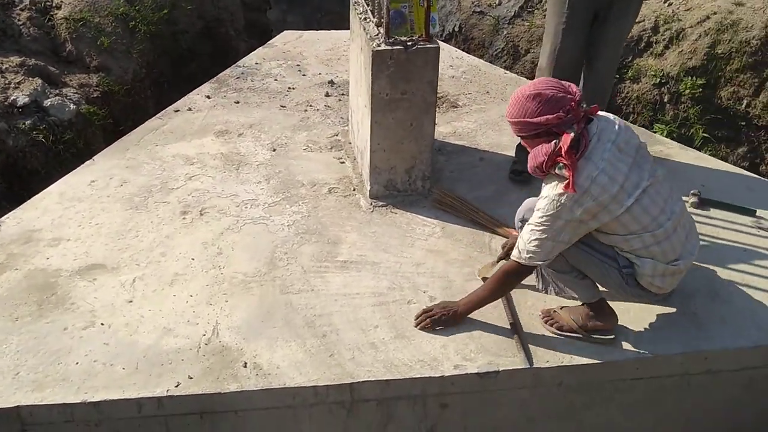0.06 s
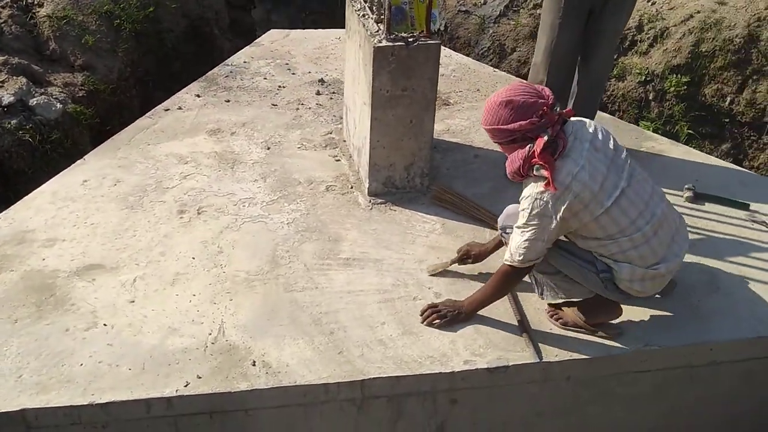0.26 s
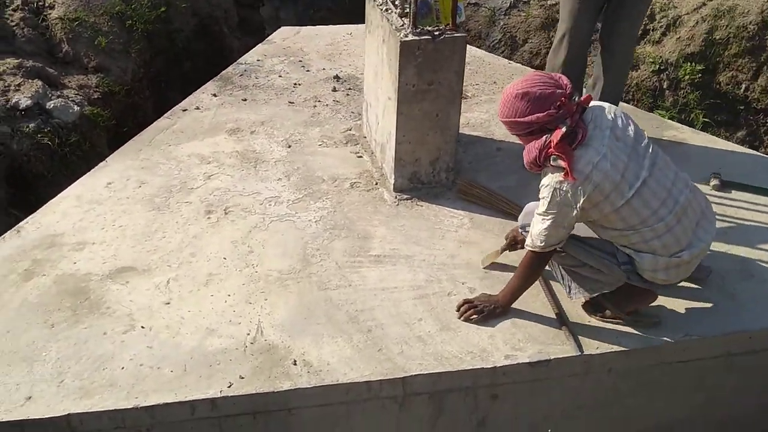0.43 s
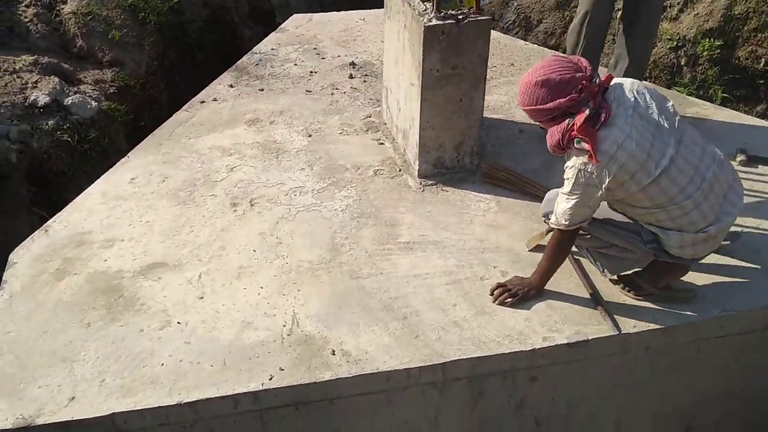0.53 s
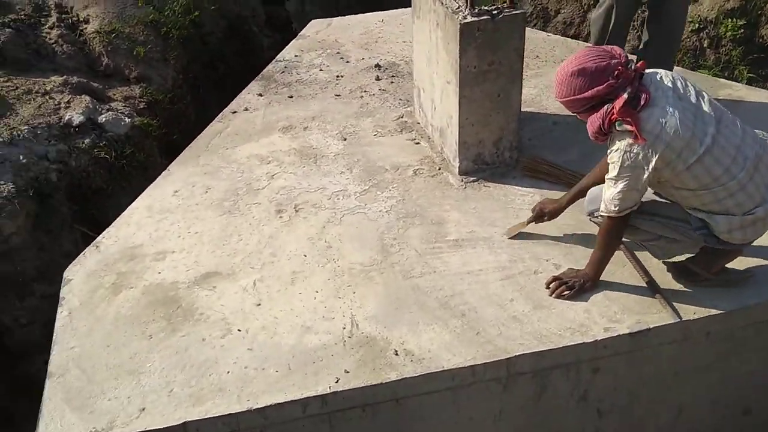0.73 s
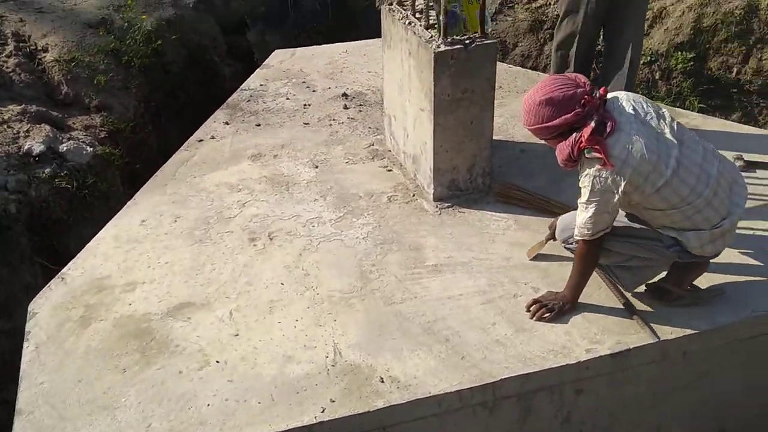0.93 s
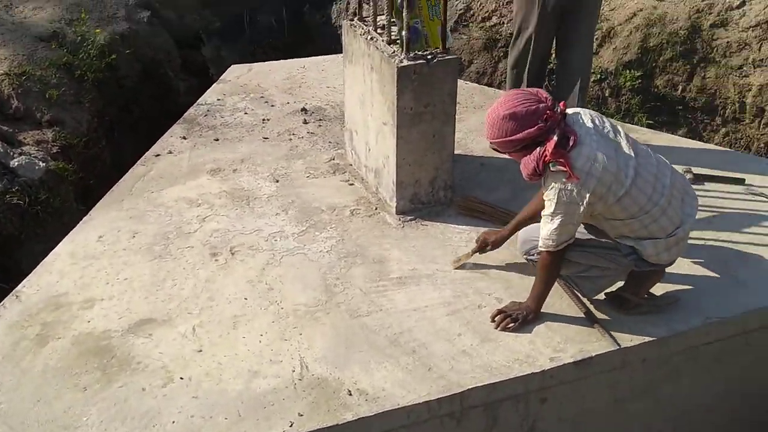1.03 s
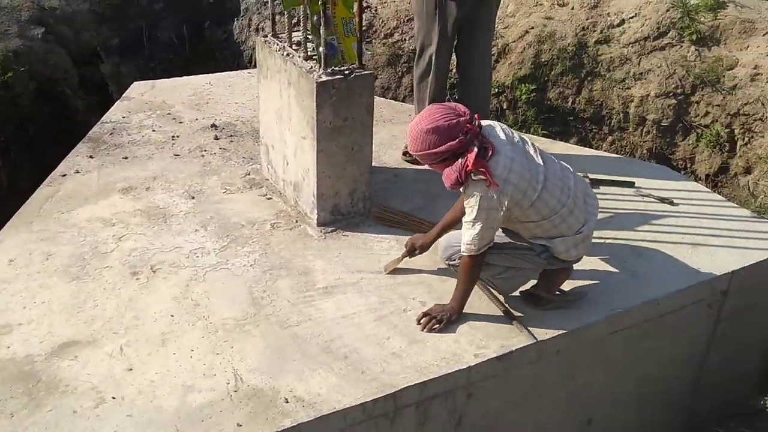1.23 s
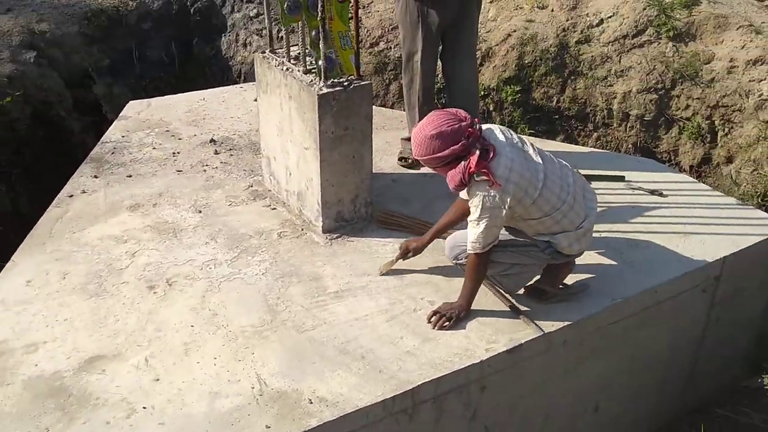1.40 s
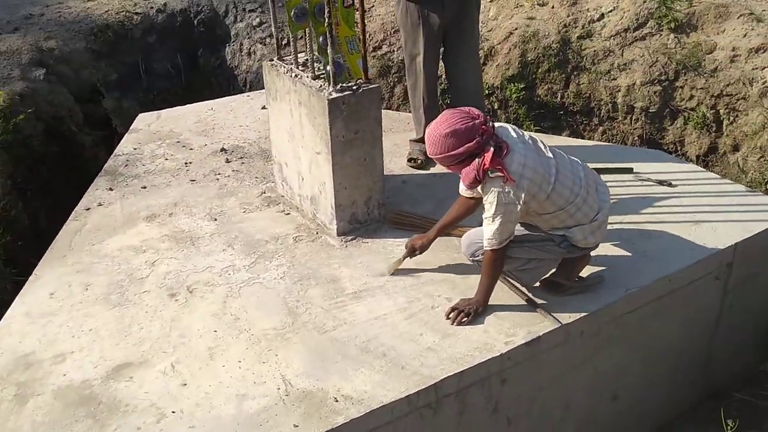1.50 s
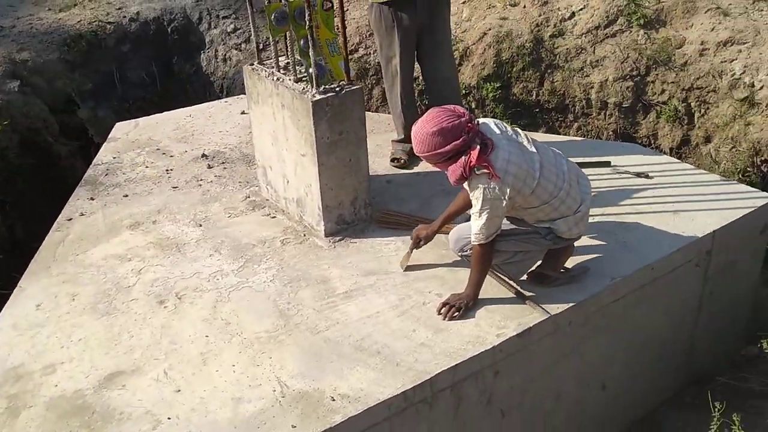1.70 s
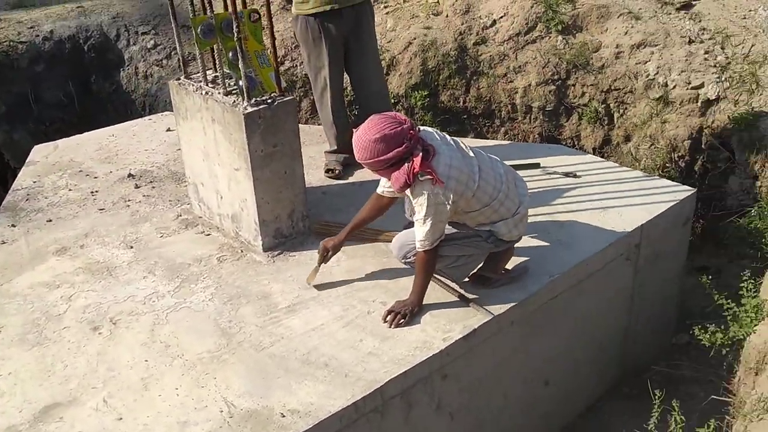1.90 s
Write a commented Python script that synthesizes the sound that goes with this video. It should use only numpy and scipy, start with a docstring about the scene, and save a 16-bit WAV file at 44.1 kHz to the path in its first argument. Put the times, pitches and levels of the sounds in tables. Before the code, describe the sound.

Gritty scraping of a hand tool on a concrete slab, about five strokes a second, with a slight ring. It catches on coarse grit and clatters near the end, while soles scuff and faint squeaks sound in the open air.

```python
"""Scraping a concrete slab

A hand tool rubs back and forth over rough concrete outdoors, five strokes a second.
Sand grains crackle under its edge and make it ring. It catches on coarse grit and
clatters at the end of the last stroke. Shifting feet scuff and knock loose stones.
A few faint squeaks and a low rumble of air lie behind."""
import sys
import numpy as np
from scipy import signal
from scipy.fft import rfft, irfft
from scipy.io import wavfile
from scipy.ndimage import map_coordinates

SR = 44100
rng = np.random.default_rng(int(sys.argv[2]) if len(sys.argv) > 2 else 0)


def transcribe(signal):
    """Save signal, clipped to [-1, 1], as a 16-bit WAV file at the path in sys.argv[1]."""
    frames = np.atleast_2d(signal).T
    limited = np.clip(frames, -1, 1)
    pcm = np.round(limited * 32767).astype(np.int16)
    wavfile.write(sys.argv[1], SR, pcm)


N = 85995
T = np.arange(N) / SR
HZ = np.maximum(np.arange(N + 1) * SR / (2 * N), 1)

# Tone colours of the sources. Each row: frequency in Hz, relative strength in dB.
AIR_COLOUR = [(150, 14), (500, -18), (1400, 4), (2300, 2.5), (3300, 3), (6000, -0.5), (15000, -16)]
RUMBLE_COLOUR = [(40, -29), (80, -8), (115, -0.5), (170, -8), (300, -16.5), (2000, -77)]
SOLE_COLOUR = [(80, -42), (180, -3.5), (340, -3.5), (800, -7), (1300, -14.5), (2000, -19), (14000, -30)]
STONE_COLOUR = [(200, -54), (600, -19.5), (820, -5), (1200, -2.5), (1620, -2), (2100, -3), (3200, -6.5),
                (6000, -15), (14000, -35)]
GRIT_COLOUR = [(300, -30), (700, -33.5), (1500, -4.5), (2300, 7), (3300, 3.5), (4300, 9), (6500, 5),
               (9000, 0), (12000, -8), (15500, -19)]
SCRAPE_COLOUR = [(600, -31), (1100, -31.5), (1650, -12), (2100, -2), (2600, -0.5), (3300, -3.5),
                 (4300, -2.5), (5500, 2), (7500, -5.5), (10500, -7.5), (12300, -14), (15500, -16.5)]
# How loud the rumble and the dragging soles are. Each row: time in seconds, level in dB.
RUMBLE_LEVEL = [(0, -45), (0.12, -87), (0.2, -57.5), (0.88, -50), (1.05, -56.5), (1.44, -48.5),
                (1.55, -58.5), (1.95, -66)]
SCUFF_LEVEL = [(0.2, -75.5), (0.55, -82), (0.66, -76), (0.77, -62), (0.81, -57), (0.875, -43), (0.98, -75),
               (1.3, -63.5), (1.425, -38.5), (1.52, -72), (1.555, -43.5), (1.62, -43.5), (1.7, -51.5),
               (1.9, -85.5)]
# Brief squeaks. Each row: start and length in seconds, pitch in Hz, level in dB.
SQUEAKS = [(-0.012, 0.041, 1505, -38.5), (0.219, 0.065, 3040, -33), (0.748, 0.026, 3380, -31.5),
           (1.776, 0.032, 893, -38), (1.832, 0.039, 2903, -42.5)]
# Soft steps. Each row: start in seconds, level in dB, fade time in seconds, pitch in Hz.
FOOTFALLS = [(0.176, -45, 0.0056, 686), (0.433, -44.5, 0.0075, 387), (0.584, -49, 0.017, 370),
             (0.728, -45, 0.011, 366), (0.7915, -23.5, 0.0024, 596), (1.091, -47, 0.019, 286),
             (1.597, -26, 0.0076, 577), (1.619, -34.5, 0.0081, 500)]
# Stones knock and grit cracks. Each row: start in seconds, level in dB, fade time in seconds.
STONE_KNOCKS = [(0.434, -37.5, 0.018), (0.475, -41.5, 0.044), (0.792, -14, 0.0032), (1.194, -23.5, 0.0021),
                (1.242, -35, 0.009), (1.281, -31, 0.0065), (1.322, -27.5, 0.017), (1.363, -25.5, 0.0068),
                (1.546, -28, 0.0087), (1.556, -20.5, 0.012), (1.585, -20.5, 0.0037), (1.5965, -19.5, 0.015),
                (1.618, -25, 0.0075), (1.643, -27, 0.019), (1.775, -41.5, 0.023), (1.829, -40.5, 0.011),
                (1.9, -42, 0.0067)]
GRIT_CATCHES = [(0.1742, -32.5, 0.011), (0.2235, -38, 0.004), (0.2552, -26, 0.0021), (0.3640, -19.5, 0.004),
                (0.461, -33, 0.0046), (0.4747, -23.5, 0.003), (0.7289, -23, 0.0063), (0.7868, -22, 0.0076),
                (0.8576, -30, 0.011), (0.9122, -25, 0.035), (1.0108, -13.5, 0.0012), (1.0901, -19, 0.012),
                (1.355, -24, 0.0045), (1.5565, -11.5, 0.0014), (1.585, -19, 0.0024), (1.5972, -15, 0.0035),
                (1.6194, -17.5, 0.0089), (1.6422, -20, 0.018), (1.6815, -34, 0.011), (1.727, -35, 0.0035),
                (1.8315, -32.5, 0.013), (1.9007, -38.5, 0.011)]
# Where the stones and the tool's edge ring. Each row: pitch in Hz, boost in dB.
STONE_RINGS = [(863, 7), (1263, 6), (1662, 6.5)]
EDGE_RINGS = [(3020, 7.4), (3270, 6.2), (3580, 3.9)]
# Steady rings of the tool. Each row: pitch in Hz, width in Hz, boost in dB.
TOOL_RINGS = [(3380, 400, 4), (5170, 170, 8), (9800, 400, 10), (11500, 300, 7), (13500, 900, 6)]
# Strokes of the tool. Each row: start and end in seconds, level in dB, time of the push in seconds,
# its change in dB, tuning factor at start and at end, the grip's ring in Hz before tuning, boost in dB.
STROKES = [(0.227, 0.377, -35, 0.34, 9, 0.95, 1.09, 2010, 9.5),
           (0.455, 0.59, -32.5, 0.53, 5, 1.043, 0.97, 2050, 9),
           (0.632, 0.797, -32.5, 0.735, 0.5, 1.088, 1.017, 2100, 7.5),
           (0.85, 0.99, -34, 0.932, 6, 1.09, 0.99, 1924, 14),
           (1.037, 1.199, -35.5, 1.14, 3.5, 1.04, 1.02, 1980, 4.5),
           (1.242, 1.376, -37, 1.325, 9, 0.97, 1.02, 2480, 6),
           (1.432, 1.66, -35, 1.64, -4.5, 1.076, 0.97, 3430, -1)]
# Bounces off a pillar and the slab. Each row: rough delay in seconds, relative strength.
REFLECTIONS = [(.0036, 0.47), (.0015, 0.52)]
# Timing at the two microphones. Each row: frequency in Hz, lead of the left one in radians.
LEFT_LEAD = [(120, -2.5), (300, -1.7), (500, 0.65), (1450, -0.22), (2300, -3.5), (2900, -5.5), (3900, -6.5),
             (4150, -11.5), (5000, -9), (5500, -10), (7000, -14)]
# How alike the two sides are. Each row: frequency in Hz, shared part of the power from 0 to 1.
SHARED_POWER = [(100, 0.97), (300, 0.71), (600, 0.79), (1200, 1), (1800, 0.21), (2300, 0.98), (2650, 0.67),
                (3400, 0.97), (4000, 0.78), (4500, 0.81), (7500, 0.12), (15000, 1)]
# Which way the tool's sound leans. Each row: frequency in Hz, left minus right in dB.
TOOL_PAN = [(3500, -0.65), (4500, 0.5), (5200, -4.5), (8000, -3.5), (10000, -6.5), (13000, -4.5)]

BITE_S, RELEASE_S, PUSH_S = 0.004, 0.011, 0.038  # a stroke's rise, fall and width of push
EDGE_WIDTH_HZ = 138


def from_db(db):
    """Turn decibels into a gain."""
    return 10 ** (np.asarray(db) / 20)


def at_hz(points):
    """Join a table's points across frequency."""
    hz, value = np.transpose(points)
    return np.interp(np.log(HZ), np.log(hz), value)


def in_time(points):
    """Join a table's points across time."""
    return np.interp(T, *np.transpose(points))


def drift(rate_hz):
    """A smooth random wobble, about 1 in size."""
    pole = np.exp(-2 * np.pi * rate_hz / SR)
    slow = signal.lfilter([1], [1, -2 * pole, pole * pole], rng.standard_normal(2 * N))[N:]
    return slow / slow.std()


def grains(per_s, spread_db):
    """Three streams of random clicks of uneven size."""
    size = from_db(spread_db * np.minimum(rng.exponential(1, (3, N)), 5))
    clicks = size * rng.choice([-1, 1], (3, N)) * (rng.random((3, N)) < per_s / SR)
    return clicks / clicks.std()


def rings(peaks, width_hz):
    """Narrow boosts, in dB, at the pitches where an object rings."""
    return sum(db / (1 + (2 * (HZ - hz) / width_hz) ** 2) for hz, db in peaks)


def body(colour_db):
    """A filter that gives an object its tone colour, with an average power gain of 1."""
    gain = from_db(colour_db)
    cepstrum = irfft(np.log(gain / np.sqrt(np.mean(gain ** 2))))
    cepstrum[1:N] *= 2  # fold so that ringing comes only after a hit
    cepstrum[N + 1:] = 0
    return np.exp(rfft(cepstrum))


def heard(drive, colour_db, pan_db=0):
    """Three streams ring an object: one reaches both microphones, the others one side each."""
    shared, *own = rfft(drive, 2 * N) * body(colour_db)
    share = np.clip(at_hz(SHARED_POWER), 0, 1)
    lag = np.exp(-1j * np.array([[0], [1]]) * at_hz(LEFT_LEAD))
    pair = np.sqrt(share) * shared * lag + np.sqrt(1 - share) * np.array(own)
    return irfft(pair * from_db(np.array([[.5], [-.5]]) * pan_db))[:, :N]


def contacts(rows, attack_s, tail_db=-16, tail_s=0.014):
    """Loudness of short touches: a quick rise, a fade and weak scatter off slab and pillar."""
    power = np.zeros(N)
    for start, db, decay_s in rows:
        age = np.maximum(T - start, 0)
        fall = np.exp(-age / decay_s) + from_db(tail_db) * np.exp(-age / tail_s)
        power += (from_db(db) * (1 - np.exp(-age / attack_s)) * fall) ** 2
    return np.sqrt(power)


def blows(rows, per_s, attack_s, strike_db=10.5):
    """Each blow is one hard touch inside a short crunch of grains."""
    drive = grains(per_s, spread_db=-1.0) * contacts(rows, attack_s)
    for start, db, _ in rows:
        drive[0, int((start + attack_s) * SR)] += from_db(db + strike_db)
    return drive


def air(hiss_db=-65):
    """Air rumbles on the microphones over a quiet outdoor hiss."""
    gusts = rng.standard_normal((3, N)) * from_db(in_time(RUMBLE_LEVEL))
    hiss = rng.standard_normal((3, N)) * from_db(hiss_db)
    return heard(gusts, at_hz(RUMBLE_COLOUR)) + heard(hiss, at_hz(AIR_COLOUR))


def echo(sound, level_db=-27, die_away_s=0.83):
    """Earth banks scatter back a faint, dull echo."""
    tail = rng.standard_normal((2, N)) * from_db(-60 * T / die_away_s) * (T > .012)
    tail = signal.lfilter(*signal.butter(1, 5000, fs=SR), tail)
    tail /= np.sqrt(np.sum(tail[0] ** 2))
    return from_db(level_db) * signal.fftconvolve(sound, tail, axes=1)[:, :N]


def squeaks():
    """Short, slightly wavering tones swell and fade."""
    out = np.zeros(N)
    waver = 1 + 0.01165 * drift(rate_hz=39)
    for start, length, hz, db in SQUEAKS:
        swell = np.sin(np.pi * np.clip((T - start) / length, 0, 1))
        out += from_db(db) * swell * np.sin(2 * np.pi * np.cumsum(hz * waver) / SR)
    return out


def scuffs():
    """Soles drag over the gritty slab."""
    drag = grains(per_s=1700, spread_db=1.5) * from_db(in_time(SCUFF_LEVEL))
    return heard(drag, at_hz(SOLE_COLOUR))


def footfalls(band_ratio=1.385):
    """Each soft step thumps around a hollow pitch of its own."""
    out = 0
    for *blow, hz in FOOTFALLS:
        low, high = hz / band_ratio, hz * band_ratio
        band = signal.butter(2, [low, high], "band", fs=SR, output="sos")
        crunch = blows([blow], per_s=1700, attack_s=0.00149) + 1e-18
        out += signal.sosfilt(band, crunch) * np.sqrt(SR / 2 / (high - low))
    return heard(out, np.zeros_like(HZ))


def stones():
    """Loose stones knock underfoot and ring briefly."""
    knocks = blows(STONE_KNOCKS, per_s=6600, attack_s=0.001464)
    return heard(knocks, at_hz(STONE_COLOUR) + rings(STONE_RINGS, width_hz=70))


def tool_rings():
    """The tool's own steady ringing, as boosts in dB."""
    return sum(rings([(hz, db)], width) for hz, width, db in TOOL_RINGS)


def pressed(drive, force_db, neutral_db=-30):
    """More force on the edge gives more treble."""
    dull = signal.lfilter(*signal.butter(1, 4500, fs=SR), drive)
    return dull + (drive - dull) * from_db(0.14 * (force_db - neutral_db))


def grit_catches():
    """Coarse grit cracks under the edge in short bursts."""
    press = contacts(GRIT_CATCHES, attack_s=0.0003)
    cracks = grains(per_s=12000, spread_db=-0.5) * press
    colour_db = at_hz(GRIT_COLOUR) + 0.41 * tool_rings() + 0.99 * rings(EDGE_RINGS, EDGE_WIDTH_HZ)
    return heard(pressed(cracks, 20 * np.log10(press + 1e-18)), colour_db, at_hz(TOOL_PAN))


def stroke_force():
    """The hand's force in dB: each stroke bites, holds, swells or eases, and lifts off."""
    total = 1e-6
    for start, end, db, push_at, push_db, *_ in STROKES:
        before = np.exp(np.minimum((start - T) / BITE_S, 50))
        after = np.exp(np.minimum((T - end) / RELEASE_S, 50))
        push = push_db * np.exp(-((T - push_at) / PUSH_S) ** 2)
        total += from_db(db + push) / (1 + before + after)
    return 20 * np.log10(total)


def grip_rings(sand, heard_at_s):
    """The tool is gripped anew for each stroke, which lets one more ring sound."""
    out = sand
    for start, end, *_, hz, boost_db in STROKES:
        during = (heard_at_s > start - BITE_S) & (heard_at_s < end + RELEASE_S)
        ring = signal.lfilter(*signal.iirpeak(hz, hz / EDGE_WIDTH_HZ, fs=SR), sand * during + 1e-18)
        out = out + (from_db(boost_db) - 1) * ring
    return out


def read_at(streams, positions):
    """Read each stream at positions that may fall between samples."""
    return np.array([map_coordinates(stream, [positions], order=3) for stream in streams])


def gliding_edge(sand, tuning):
    """Grains ring the edge, whose pitch slides as the grip turns."""
    positions = np.cumsum(tuning)  # reading faster raises the pitch
    ringing = irfft(rfft(np.tile(sand, 2)) * body(rings(EDGE_RINGS, EDGE_WIDTH_HZ)))
    heard_at_s = np.interp(np.arange(2 * N), positions, T)
    return read_at(grip_rings(ringing, heard_at_s), positions)


def reflections(sound, tuning, sway=0.0557):
    """Bounces off pillar and slab hollow the sound and shift as the hand moves."""
    for delay_s, gain in REFLECTIONS:
        earlier_s = T - delay_s * (1 + sway * drift(rate_hz=2.8)) / tuning
        sound = (sound + gain * read_at(sound, earlier_s * SR)) / np.sqrt(1 + gain ** 2)
    return sound


def scraping(boost_db=1, coarse_db=-8, judder_db=1.46):
    """Sand and larger grains break under the juddering edge."""
    force_db = stroke_force()
    tuning = in_time([point for start, end, _, _, _, first, last, *_ in STROKES
                      for point in ((start, first), (end, last))])
    sand = grains(per_s=11000, spread_db=3) + from_db(coarse_db) * grains(per_s=160, spread_db=3)
    scrape = reflections(gliding_edge(sand, tuning), tuning)
    scrape *= from_db(boost_db + force_db + judder_db * drift(rate_hz=91))
    return heard(pressed(scrape, force_db), at_hz(SCRAPE_COLOUR) + tool_rings(), at_hz(TOOL_PAN))


def scene():
    """The work on the slab, its echo and the air."""
    work = scraping() + grit_catches() + stones() + footfalls() + scuffs() + squeaks()
    return work + echo(work) + air()


def record(dry):
    """Cut the highest treble steeply."""
    return signal.sosfilt(signal.ellip(12, .2, 80, 15650, fs=SR, output="sos"), dry)


dry = scene()
out = record(dry)
transcribe(out)
```